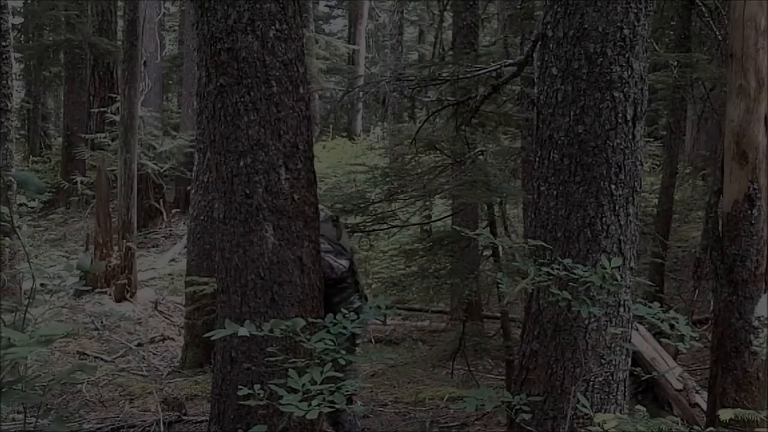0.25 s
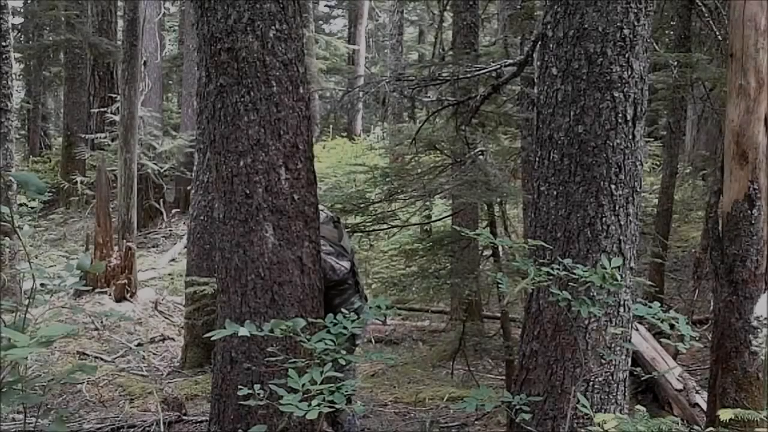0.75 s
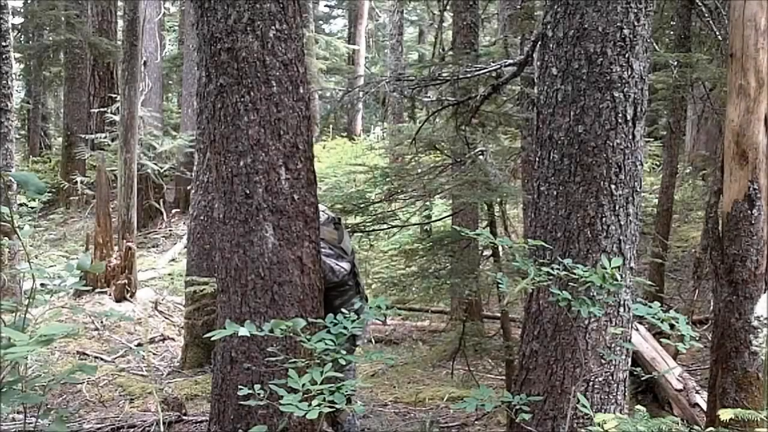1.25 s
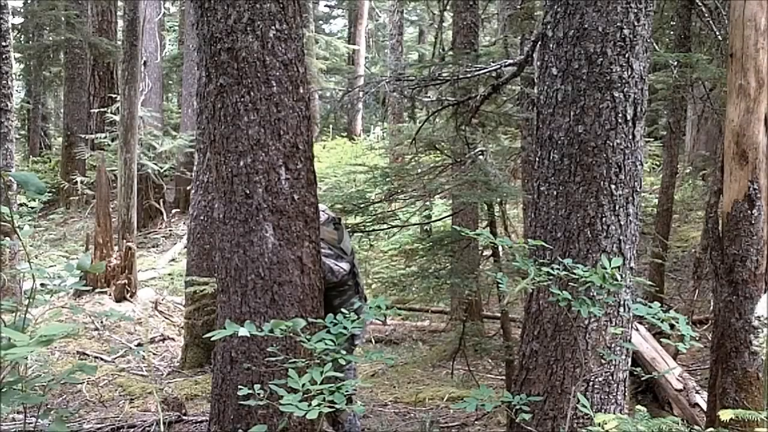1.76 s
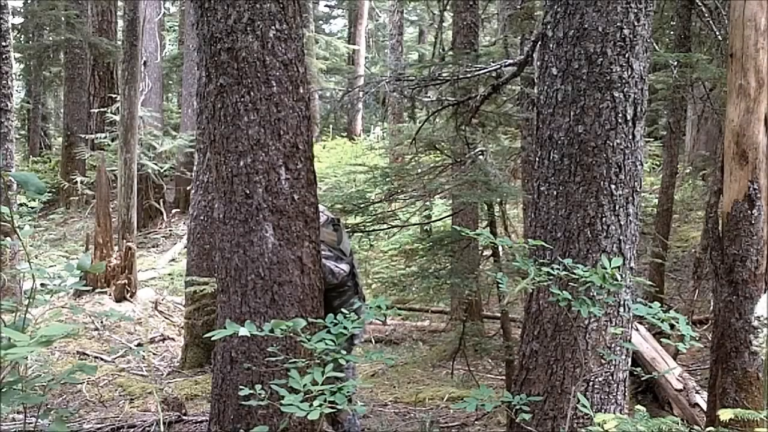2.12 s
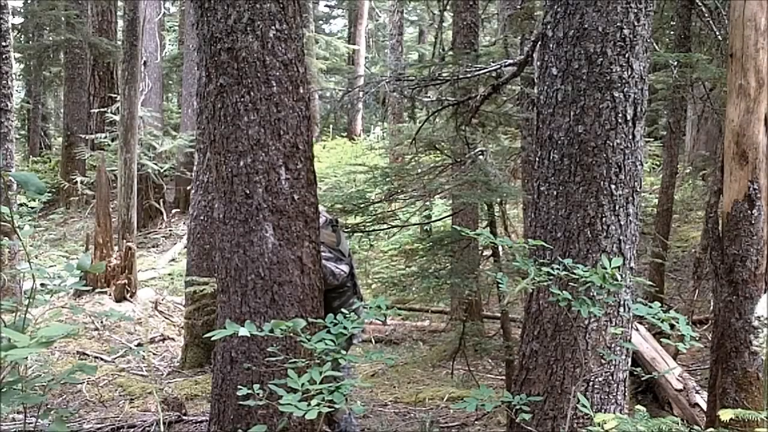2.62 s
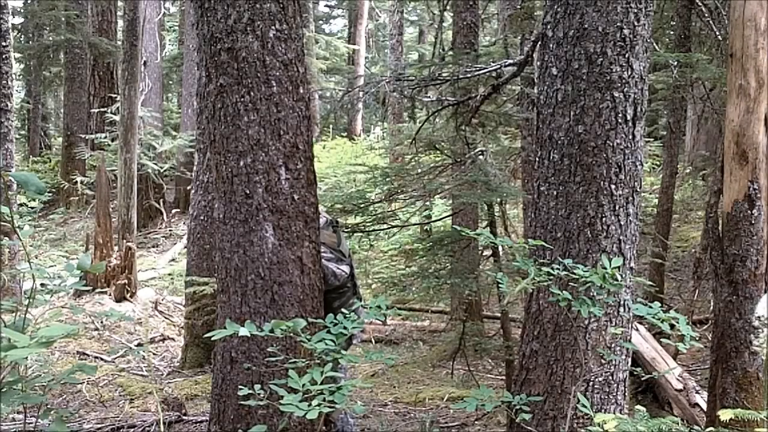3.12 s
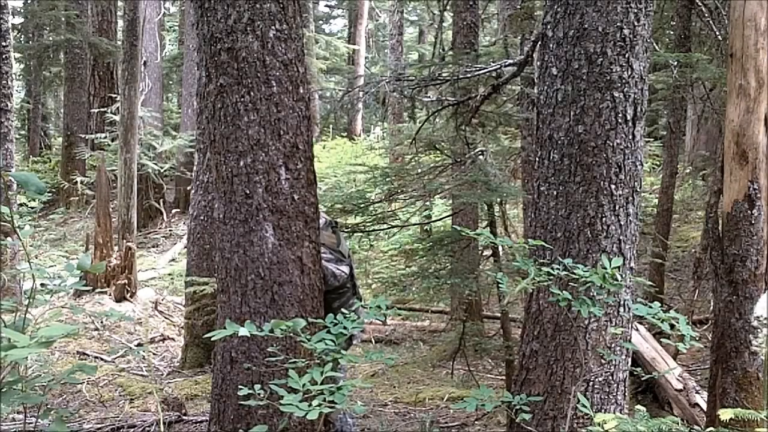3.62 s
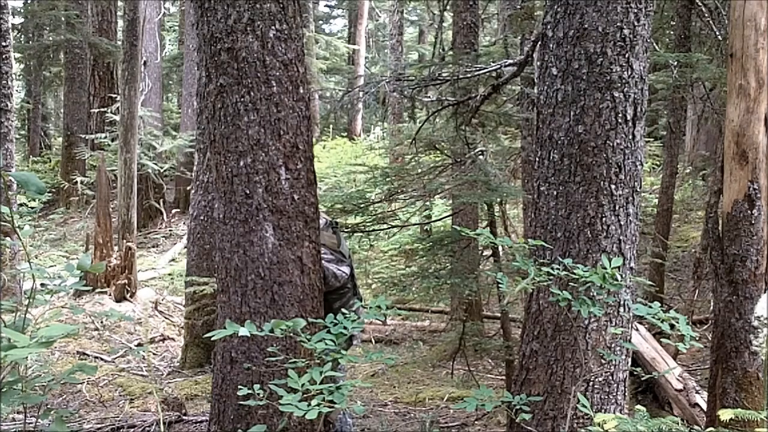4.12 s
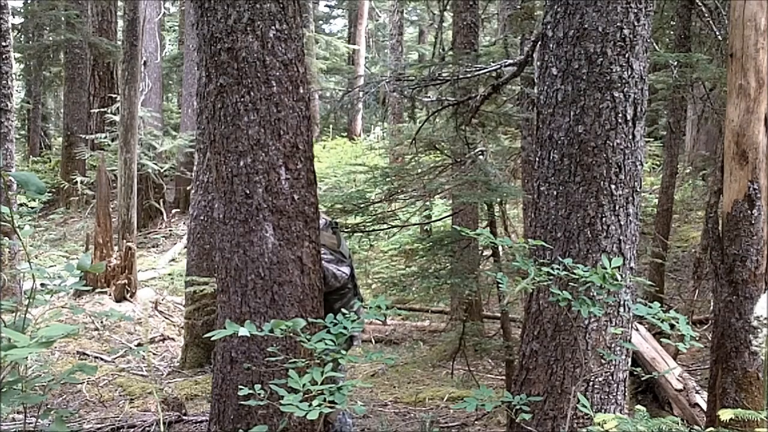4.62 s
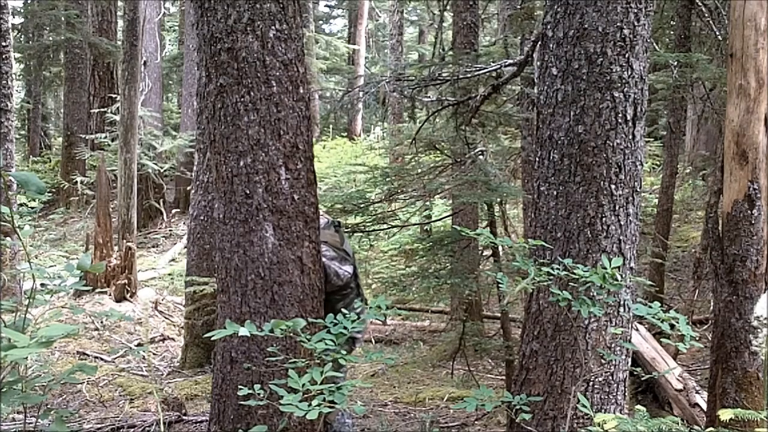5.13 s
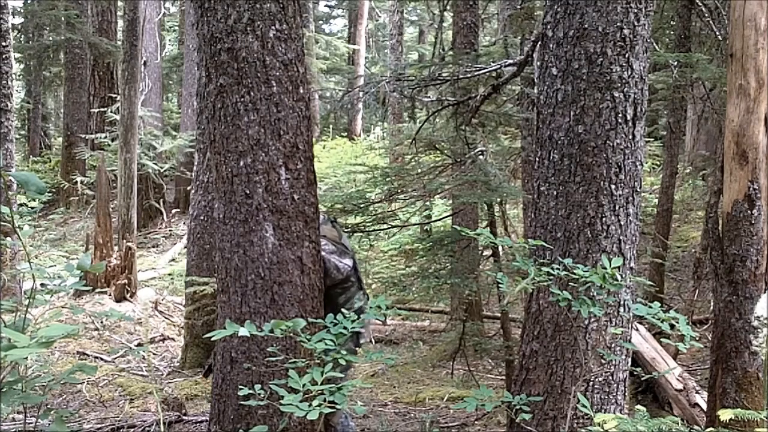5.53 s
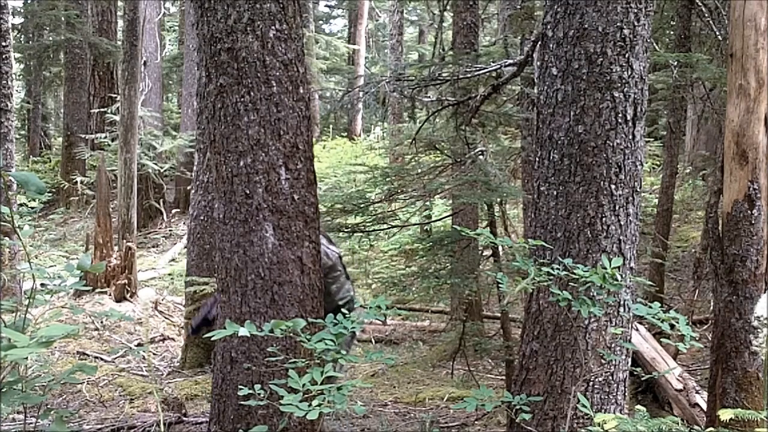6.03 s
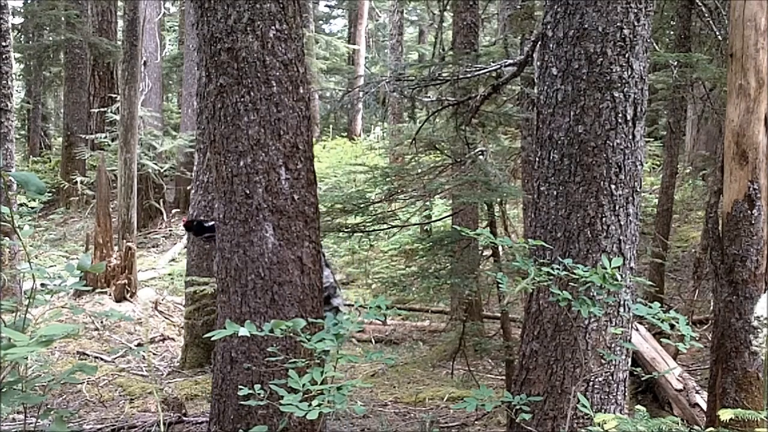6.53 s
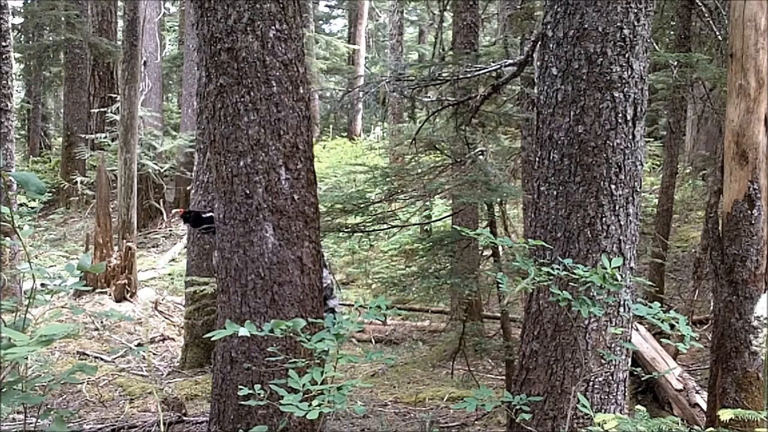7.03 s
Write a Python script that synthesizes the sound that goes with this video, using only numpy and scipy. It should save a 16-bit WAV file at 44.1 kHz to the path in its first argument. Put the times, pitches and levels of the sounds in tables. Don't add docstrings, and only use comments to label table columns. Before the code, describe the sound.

Short bright pops in two fast bursts come from a motorised pellet gun at some distance, with gearbox rattle, whine and brief echoes off trunks. Irregular hard cracks and woody knocks land very close. Hollow dry slams end the firing around four seconds. Then it is quiet: faint wind, low hum, hiss and a fine camera ticking, with the shooter stirring leaves and a few twigs clicking near the end.

```python
import sys
import numpy as np
from scipy import signal
from scipy.fft import rfft, irfft
from scipy.io import wavfile

SR = 44100
rng = np.random.default_rng(int(sys.argv[2]) if len(sys.argv) > 2 else 0)


def to_wav(sig):
    pcm = np.clip(np.atleast_2d(sig), -1, 1) * 32767
    pcm = np.round(pcm).astype(np.int16)
    wavfile.write(sys.argv[1], SR, pcm.T)


def volts(x):
    e = np.asarray(x, float) / 20
    return 10 ** e


N = 320166


def columns(rows, t):
    s, *rest = np.transpose(rows)
    return [np.interp(t, s, c) for c in rest]


def band(x, low_hz, high_hz, order=2):
    return signal.sosfilt(signal.butter(order, [low_hz, high_hz], "band", fs=SR, output="sos"), x)


def unit(x):
    return x / np.sqrt(np.mean(x ** 2) + 1e-20)


def ring(clicks, hz, t60):
    radius, angle = volts(-60 / (t60 * SR)), 2 * np.pi * hz / SR
    feedback = [1, -2 * radius * np.cos(angle), radius * radius]
    return signal.lfilter([0, np.sin(angle)], feedback, clicks + 1e-18)


def ring_all(clicks, modes):
    return sum(volts(db) * ring(clicks, hz, t60) for hz, db, t60 in modes)


def clicks_at(rows, size):
    out = np.zeros(size + 2)
    for s, db in rows:
        i, part = divmod(s * SR, 1)
        out[int(i):int(i) + 2] += volts(db) * np.array([1 - part, part])
    return out[:size]


def grains(per_s, spread_db):
    sizes = volts(spread_db * np.minimum(rng.exponential(1, N), 5)) * rng.choice([-1, 1], N)
    return unit(sizes * (rng.random(N) < per_s / SR))


def spells(rows, t, rise_db_per_s, fall_db_per_s):
    coarse_t = t[::64]
    gain = 0
    for start, end, db in rows:
        early = np.maximum(start - coarse_t, 0)
        late = np.maximum(coarse_t - end, 0)
        gain = gain + volts(db - rise_db_per_s * early - fall_db_per_s * late)
    return np.interp(t, coarse_t, gain)


# first_pop_s, cycles, cycle_s, extra_first_wait_s, battery_sag_s_per_cycle
BURSTS = [
    (.5516, 21, .08094, .00874, .000063),
    (2.3951, 13, .0818, .01473, .00003),
]


def shots():
    wait_left = .17
    rows = []
    for (s, cycles, cycle_s, wait_s, sag_s), db in zip(BURSTS, (0, 1)):
        k = np.arange(cycles)
        sag = sag_s * k * (k - 1) / 2
        spin_up = wait_s * (1 - wait_left ** k) / (1 - wait_left)
        times = s + k * cycle_s + sag + spin_up
        rows += zip(times, db + rng.standard_normal(cycles))
    return [(s, db) for s, db in rows if min(abs(s - dry_s) for dry_s, _ in EMPTY_SLAMS) > .02]


# pitch_hz, level_db, t60_s
POP_MODES = [(1427, -7, 0.0056), (4440, -5, 0.0025), (2105, -14, 0.005), (3130, -17.5, 0.0024)]
# pitch_hz, level_db, t60_s
BODY_MODES = [(1002, -21, 0.041), (1283, -21.5, 0.023), (1645, -22.5, .015)]


def pops(fired, lag_s=-0.000011, db=-17, click_db=6.0, settle_s=0.00279):
    clicks = clicks_at([(s - lag_s, level + db) for s, level in fired], N)
    settle = np.roll(clicks, round(settle_s * SR))
    barrel = volts(click_db) * clicks + ring_all(clicks, POP_MODES)
    return ring_all(settle, BODY_MODES) - barrel


# start_s, peak_db
EMPTY_SLAMS = [
    (3.147, -19),
    (3.394, -19.5),
    (4.049, -19.5),
    (4.153, -20.5),
]
# pitch_hz, level_db, t60_s
SLAM_MODES = [(600, -11, .006), (900, -8, .006), (1250, -1, .006), (1650, -5, .005), (2150, -12, .005),
              (3400, -16, .003), (4050, -7.5, .006), (4500, -15, .004)]


def slams(db=-22, lag_s=0.00091, t60_s=0.037, bright_db=-4.0):
    blows = np.zeros(N)
    t = np.arange(1500) / SR
    for s, level in EMPTY_SLAMS:
        i = round((s + lag_s) * SR)
        rattle = rng.standard_normal(1500) ** 3 / 4
        impact = 4.7 * (t == 0)
        blows[i:i + 1500] = volts(level + db - 60 * t / t60_s) * (rattle + impact)
    return volts(bright_db) * blows + ring_all(blows, SLAM_MODES)


# start_s, end_s, level_db
TRIGGER = [
    (.47, .56, -63),
    (.62, 2.2, -46.5),
    (1.1, 2.05, -63),
    (2.42, 3.22, -45.5),
    (4.15, 4.24, -53),
]
# after_pop_s, pitch_hz, level_db
WHINE = [(.03, 2440, -87.5), (.045, 2404, -56.5), (.065, 2200, -55), (.078, 2035, -70)]
# time_s, pitch_hz, level_db
SPIN_UP = [(.49, 1400, -70), (.505, 1490, -59), (.535, 1500, -59), (.55, 1490, -68)]


def gearbox(t, fired):
    running = spells(TRIGGER, t, rise_db_per_s=212, fall_db_per_s=75)
    rattle = running * volts(-6.5) * unit(band(grains(7900, 5.8), 600, 7500))
    pop_s = np.array([s for s, db in fired])
    since = t - pop_s[np.clip(np.searchsorted(pop_s, t) - 1, 0, None)]
    puff = 1 + 4.0 * np.exp(-np.abs(since) / 0.018) * (since > 0)
    hiss = running * volts(-19.5) * puff * unit(band(grains(6036, 3.49), 2900, 12500))
    whine = 0
    for rows, clock in ((WHINE, since), (SPIN_UP, t)):
        hz, db = columns(rows, clock)
        wobble_hz = 45 * unit(band(rng.standard_normal(N), 20, 300))
        tone = np.sin(2 * np.pi * np.cumsum(hz + wobble_hz) / SR)
        whine = whine + volts(db) * tone * (clock > rows[0][0]) * (clock < rows[-1][0])
    return rattle + hiss + whine


# start_s, peak_db (3-5 kHz), knock_db, edge_db, snap_db (against the peak)
STRIKES = [(0.889, -23, -13.5, -23.5, -19.5), (1.1702, -20, -7, -7.5, -8.5), (1.193, -23.5, -27.5, -20, -6),
           (1.2027, 1, -25, -46.5, -17.5), (1.2698, -14, -17, -7, -14), (1.2794, -21, -27, -20.5, -11.5),
           (1.4482, -3, -54, -20, -17), (1.5484, -7, -33.5, -14, -11), (1.617, -22.5, -9.5, -36.5, -15.5),
           (1.6975, 0.5, -8.5, -45, -20), (1.8602, -4.5, -12.5, -45, -24.5), (2.036, -28.5, -16, -9, -8),
           (2.3518, -13.5, -17.5, -22, -15.5), (2.4085, -6.5, -40.5, -70, -50),
           (3.2726, 2.5, -20.5, -62.5, -19), (3.3501, -2.5, -26.5, -13.5, -20.5),
           (3.4451, -4.5, -8.5, -18, -20), (3.6072, -16.5, -48, -10, -22), (3.8296, -26, -3, -29, -18),
           (4.0961, -25, -29, -24, -18), (4.2574, -22, -22, -11, -21), (4.453, -30, -17, -36, -50)]
# start_s, peak_db (3-5 kHz), knock_db, treble_db (against the peak)
CHIPS = [(1.0844, -28.5, -5, -12.5), (1.0939, -24.5, -10, -16), (1.1814, -23, -14, -18),
         (1.2286, -21.5, -16, -30), (1.2474, -38, 3, -8.5), (1.3269, -25, -6.5, -36),
         (1.5938, -29.5, -2, -10.5), (1.6694, -47.5, 16, -1.5), (1.7254, -27, -18.5, -29),
         (1.7454, -38, 0.5, -29.5), (1.8307, -26, -4.5, -7), (1.9071, -36, 2, -6.5), (1.9889, -23, -7, -17),
         (2.0926, -27, -15, -14), (2.1404, -36, -5, -10), (2.1774, -31, -0.5, -13), (3.1168, -31, 1, -11.5),
         (3.2854, -25.5, -19, -43), (3.3634, -24.5, -19, -26), (3.4574, -30, -3, -27),
         (3.5344, -35, -9, -7.5), (3.6256, -26.5, -31, -26), (3.65, -30, -28, -36), (3.7324, -35, -11, -6),
         (3.7539, -30, -6.5, -29), (3.7674, -27.5, -19, -24), (3.7844, -34, -15, -29),
         (3.8087, -37, -5, -31)]
# start_s, peak_db (3-5 kHz), knock_db, treble_db (against the peak)
TWIGS = [(4.5815, -57, 3, -29), (4.632, -66, -5, -24), (4.7954, -55, -4, -22), (4.847, -61, 4, -22),
         (4.9014, -60, 2, -14), (5.8606, -47, 1, -14), (5.878, -51, 2, -12), (5.8954, -58, -10, -12),
         (5.9678, -58, -2, -16), (6.0846, -36, -12, -14), (6.137, -56.5, 6, -20), (6.2108, -59, 2, -21),
         (6.2951, -44.5, -2, -25), (6.3769, -48, -1, -39), (6.8618, -37.5, -10.5, -26),
         (6.9172, -28, -16, -27), (6.9398, -40, -17, -31), (7.0484, -59, 0.5, -26), (7.0733, -54, 3, -22),
         (7.1008, -51.5, 2, -30), (7.2544, -58, 8.5, -20)]


def contacts():
    rows = [(*row, .015) for row in STRIKES]
    for table, t60_s in ((CHIPS, .015), (TWIGS, .013)):
        for s, db, knock, treble in table:
            rows.append((s, db, knock, treble + 3, treble, t60_s))
    return rows


# pitch_hz, level_db, t60_s
BARK = [(800, -19.5, 0.01), (1080, -1, 0.017), (1420, 7.5, .008), (1720, 5, 0.021), (1850, 10, 0.0047)]
# start_s, level_db, pitch_hz, t60_s
BOOMS = [(1.2034, -11.5, 180, 0.0026), (1.421, -37, 110.4, .04), (1.6697, -27, 131, 0.017),
         (1.6966, -38, 110, 0.025), (1.6985, -29, 517, 0.06), (1.6985, -24.5, 800, 0.038),
         (1.8612, -27, 800, 0.045), (1.8613, -41.5, 524, 0.069), (3.351, -25.5, 250, 0.0043),
         (3.4465, -25, 942, 0.022), (3.6085, -26.5, 4550, 0.022)]


def hits(knock_db=-1.5, crack_db=-5.0, edge_db=8.0, snap_db=15, debris_db=-15, lag_s=.0008):
    out = np.zeros(N + 4000)
    t = np.arange(3000) / SR
    s, db, knock, edge, snap, t60 = np.transpose(contacts())[..., None]
    chance = rng.standard_normal((len(s), 3000))
    debris = volts(debris_db - .45 * (db + 20)) * chance ** 3 / 4
    crumble_s = np.clip(t60 * volts(-.15 * (db + 7.5)), .002, .1)
    blow = debris * volts(-60 * t / crumble_s)
    blow[:, 0] += np.sign(chance[:, 0])
    wood = 0
    for (hz, level, d), luck in zip(BARK, chance[:, -5:].T):
        wood = wood + volts(level + 1.3 * luck[:, None]) * ring(blow, hz, d)
    layers = [(band(wood, 600, 5000), knock + knock_db),
              (band(blow, 3200, 6300), crack_db),
              (band(blow, 5500, 8200), edge + edge_db),
              (band(blow, 9300, 17000), snap + snap_db)]
    sounds = 0
    for layer, gain_db in layers:
        peak = np.abs(layer).max(axis=1, keepdims=True)
        sounds = sounds + volts(db + gain_db) * layer / peak
    for i, sound in zip(np.round((s[:, 0] + lag_s) * SR).astype(int), sounds):
        out[i:i + 3000] += sound
    booms = sum(ring(clicks_at([(start, level)], N), hz, d) for start, level, hz, d in BOOMS)
    return out[:N] + booms


def forest(x, t60_s, far_db, trunks):
    t = np.arange(SR) / SR
    uneven = volts(3.0 * rng.standard_normal(SR))
    far = rng.standard_normal(SR) * uneven * volts(-60 * t / t60_s) * np.clip(t / .01, 0, 1)
    smear = [0.93, 0.29, -1.0, 0.87, -0.97, 0.37, -0.14, 0.29, 0.43, -0.74]
    near = signal.lfilter(smear, [1], clicks_at(trunks, SR))
    return signal.oaconvolve(x, near + volts(far_db) * band(far, 470, 9000, order=1))[:N]


# start_s, end_s, level_db
RUSTLE = [
    (.0, 7.26, -81),
    (3.61, 3.83, -59.5),
    (4.46, 4.5, -70.5),
    (5.82, 6.11, -71.5),
    (6.12, 6.43, -75.5),
    (6.87, 6.97, -70.5),
    (7.05, 6.6, -76),
]


def brush(t):
    stir = spells(RUSTLE, t, rise_db_per_s=198, fall_db_per_s=136)
    return stir * unit(band(grains(3000, 4.4), 750, 8000, order=1))


# pitch_hz, level_db (per Hz)
AIR = [(8.8, -22.5), (15, -.5), (60, -2), (100, -5), (134, -11.5), (298, -10.5), (1560, -24.5), (2720, -40)]
# start_s, end_s, level_db
GUSTS = [
    (1.0, 1.8, -65),
    (4.0, 4.25, -68.5),
    (5.7, 7.2, -68.5),
]


def wind(t):
    hz = np.maximum(np.fft.rfftfreq(N, 1 / SR), 1)
    level_db = columns([(np.log(f), db) for f, db in AIR], np.log(hz))[0]
    shape = volts(level_db) / (1 + (hz / 3300) ** 10)
    air = irfft(rfft(rng.standard_normal(N)) * shape, N)
    gain = np.hypot(volts(-63.5), spells(GUSTS, t, 25, 25))
    return air * gain / np.std(band(air, 250, 700))


# start_s, end_s, level_db
HUM_LOW = [(.05, 1.266, -60.5), (1.35, 1.7, -65.5), (2.399, 3.1, -68), (3.502, 5.9, -62.5),
           (6.3, 6.754, -63), (7.0, 7.18, -63.5)]
# start_s, end_s, level_db
HUM_HIGH = [(0.795, 1.194, -65.5), (1.35, 1.75, -64), (2.14, 3.146, -64), (4.55, 5.95, -65),
            (6.099, 7.194, -65)]


def camera_motor(t):
    turn = 2 * np.pi * 102.2 * t
    hum = 0
    for harmonic, rows in ((1, HUM_LOW), (2, HUM_HIGH)):
        waver = volts(1.5 * unit(band(rng.standard_normal(N), 1, 8, order=1)))
        hum = hum + waver * spells(rows, t, 89.5, 89.5) * np.sin(harmonic * turn)
    return np.sqrt(2) * hum


# delay_s, level_db
TRUNKS = [(.0200, -6.5), (0.0213, -11), (0.0325, -27), (.0420, -19), (0.0479, -18.5), (.0568, -25.5),
          (0.0607, -30.5), (0.0781, -18)]


def scene():
    t = np.arange(N) / SR
    fired = shots()
    gun = band(pops(fired), 950, 8500) + band(slams(), 650, 12000)
    near = hits()
    gun_echo = forest(gun, 0.8, -43, TRUNKS)
    near_echo = forest(near, 0.36, -48, [(.0031, -24), (.0043, -19)])
    background = wind(t) + brush(t) + camera_motor(t)
    return (gun + near + gun_echo + near_echo + gearbox(t, fired) + background)[None]


# low_hz, high_hz, level_db
LOBES = [(5450, 7200, -4.5), (8874, 10300, -9.5), (11200, 12300, -6), (12300, 15600, -11.5)]
# pitch_hz, width_hz
NOTCHES = [(2720, 520), (5500, 250), (7800, 1300), (10950, 500)]


def microphone(dry):
    body = signal.sosfiltfilt(signal.cheby1(5, .5, 5060, fs=SR, output="sos"), dry)
    top = sum(volts(db) * band(dry, low_hz, high_hz, order=3) for low_hz, high_hz, db in LOBES)
    peak = volts(4.0) * signal.lfilter(*signal.iirpeak(4050, 2.5, fs=SR), body)
    hiss = signal.sosfilt(signal.cheby2(18, 40, 15450, fs=SR, output="sos"), rng.standard_normal(N))
    hiss = band(hiss, 3000, 6800) + band(hiss, 9400, 19000)
    x = body + peak + top + volts(-74.5) * hiss
    for hz, width in NOTCHES:
        x = signal.lfilter(*signal.iirnotch(hz, hz / width, fs=SR), x)
    return x


# pitch_hz, level_db, t60_s
TICK_RINGS = [(5350, -76, .006), (6100, -75, .006), (7200, -70, .005), (8200, -69.5, .0035),
              (9700, -76, .003)]
# pitch_hz, level_db
WHISTLES = [(5420, -99), (6083, -96), (11536, -100)]


def electronics():
    last_s = (N - 1) / SR
    frames = clicks_at([(s, 0) for s in np.arange(.0007, last_s, 1 / 59.94)], N)
    x = ring_all(frames, TICK_RINGS)
    for hz, db in WHISTLES:
        x = x + volts(db) * unit(band(rng.standard_normal(N), hz - 25, hz + 25))
    return x


def low_pass(x):
    return signal.sosfilt(signal.butter(12, 16640, fs=SR, output="sos"), x)


def record(dry):
    x = microphone(dry) + electronics()
    x = volts(-15) * x + signal.sosfiltfilt(signal.cheby2(16, 30, 15520, fs=SR, output="sos"), x)
    x = signal.sosfilt(signal.cheby2(10, 50, 17300, fs=SR, output="sos"), x)
    return low_pass(x)


dry = scene()
out = record(dry)
to_wav(out)
```